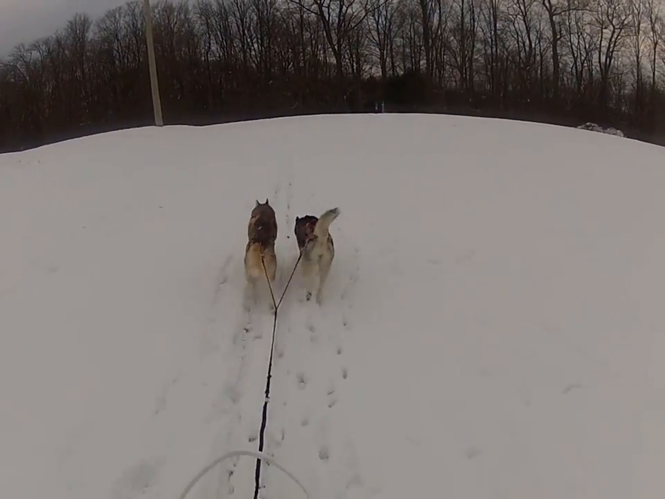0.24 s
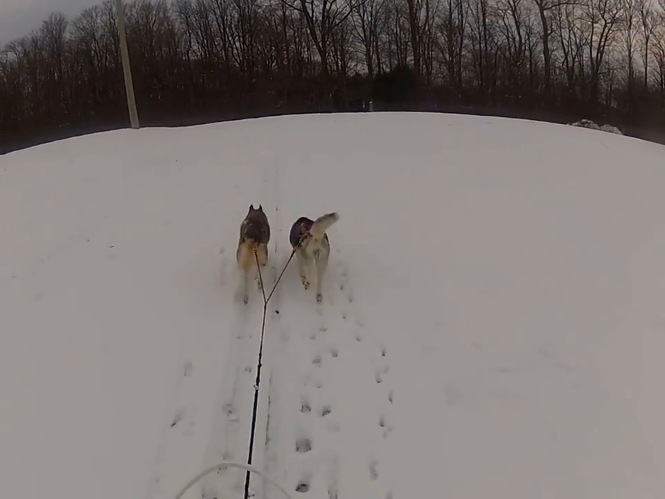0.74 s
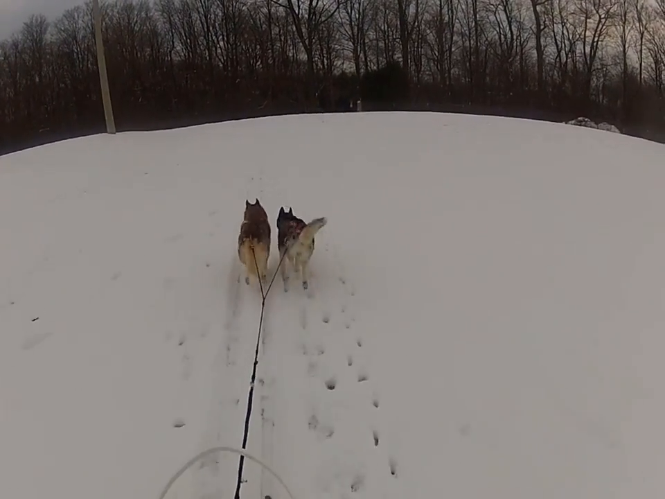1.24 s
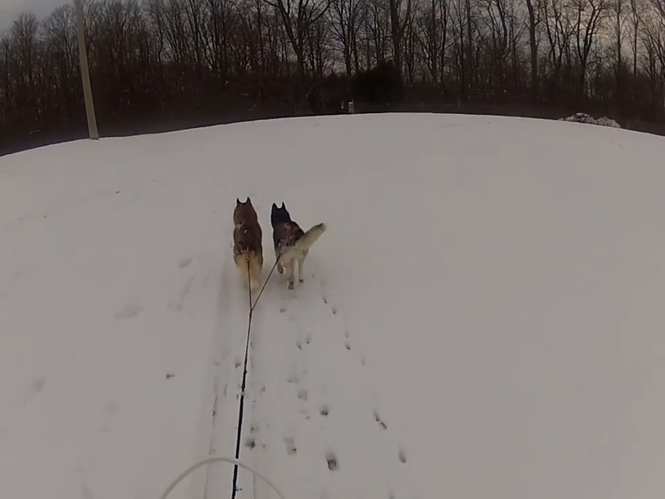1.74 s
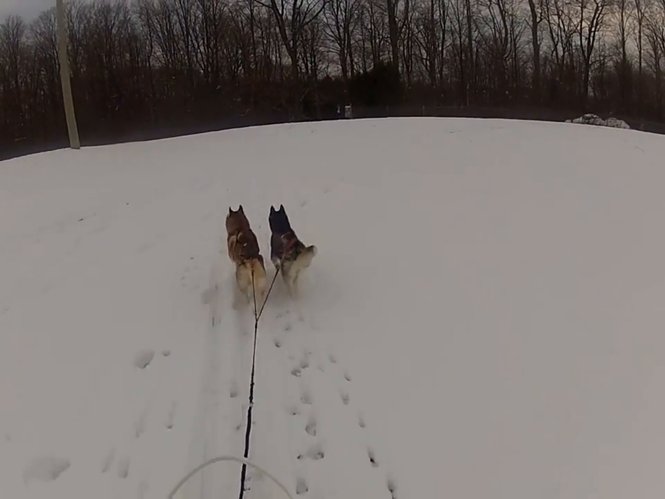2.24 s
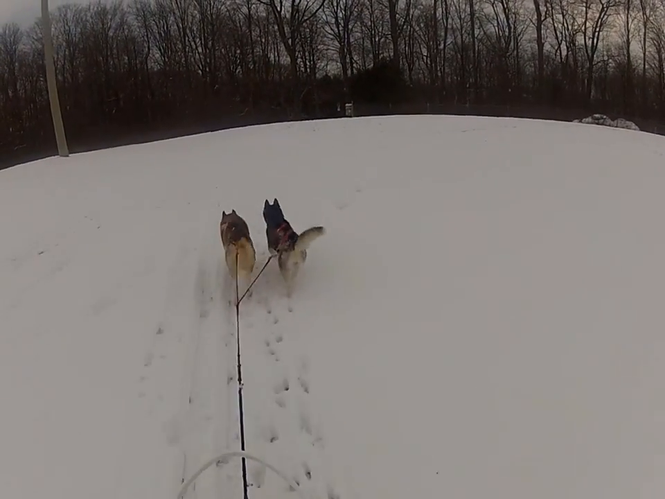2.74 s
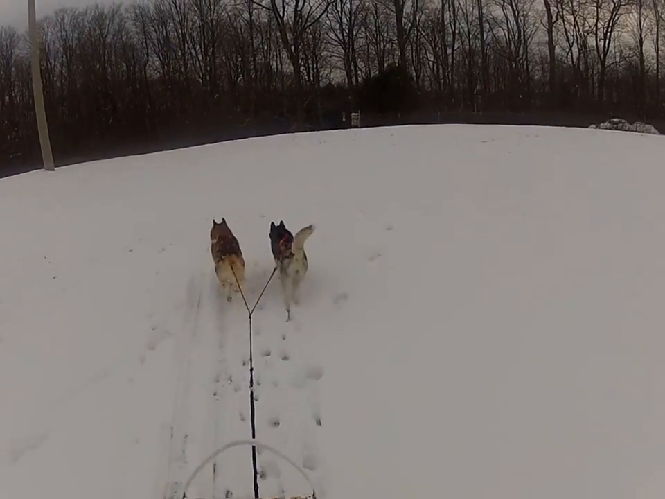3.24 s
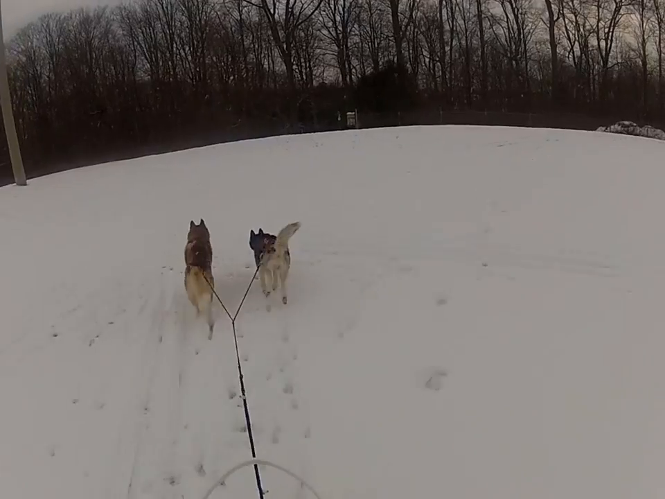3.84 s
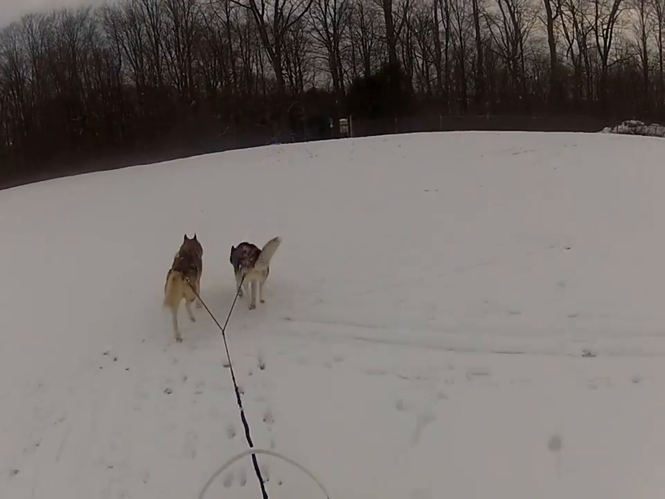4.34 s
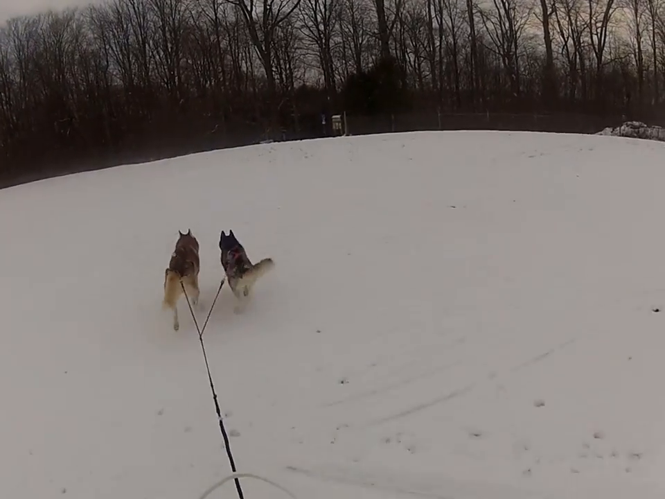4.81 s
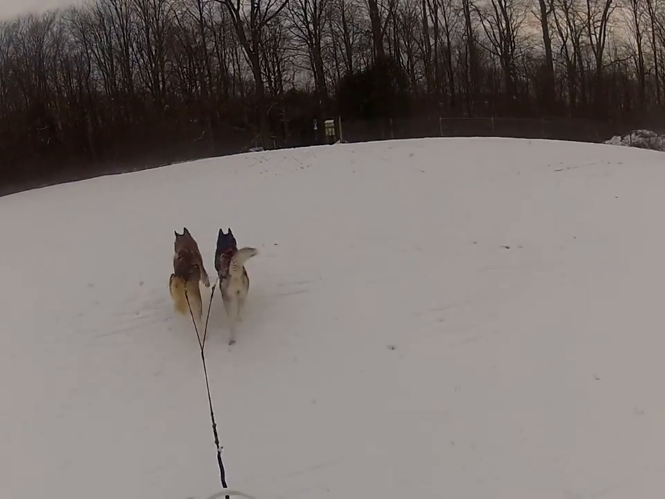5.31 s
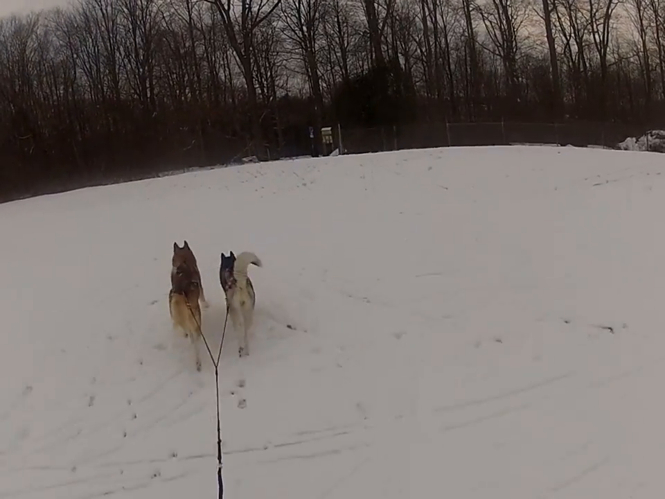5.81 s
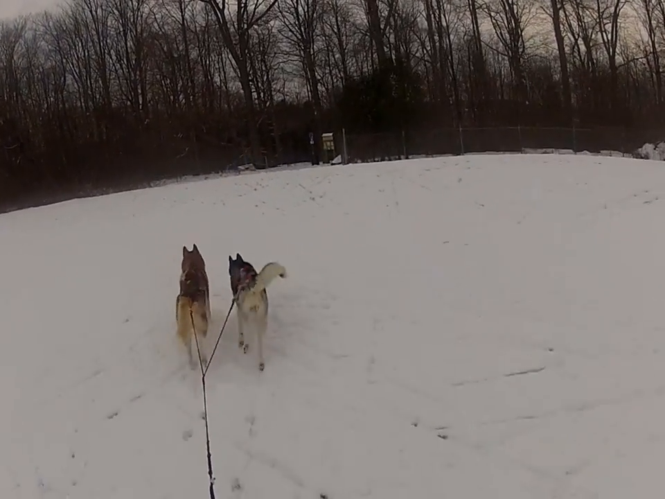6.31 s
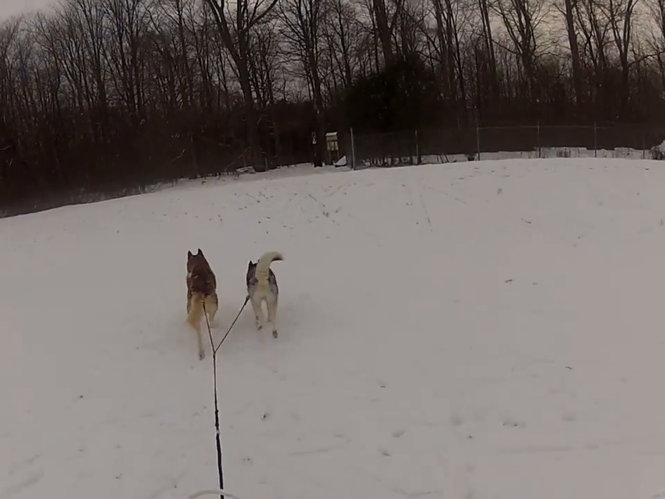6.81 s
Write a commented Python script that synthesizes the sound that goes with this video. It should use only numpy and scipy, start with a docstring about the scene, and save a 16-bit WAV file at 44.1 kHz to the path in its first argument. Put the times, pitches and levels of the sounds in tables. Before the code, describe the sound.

A muffled snow hiss runs under irregular bumps, with a camera clattering and thudding against its plastic case as a sled jolts along.

```python
"""On a dog sled over snow, inside the closed plastic case of a small camera: the runners hiss through the case
and the frame shudders, both filtered noise. At bumps the mount thumps and the camera knocks and rattles
against the case, as struck decaying modes. Faint high noise, about 4.4 to 6.6 kHz, rises in short patches,
with a few faint short bursts of high noise.
Sampling at 12 kHz and holding in steps puts mirror images of the sound in the treble."""
import sys
import numpy as np
from scipy import signal
from scipy.fft import rfft, irfft, next_fast_len
from scipy.io import wavfile

SR = 44100
rng = np.random.default_rng(int(sys.argv[2]) if len(sys.argv) > 2 else 0)


def persist_wave(psi):
    """Save psi, clipped to +-1, as 16-bit WAV."""
    counts = np.round(np.clip(psi, -1, 1) * 32767).astype(np.int16)
    wavfile.write(sys.argv[1], SR, np.atleast_2d(counts).T)


N = 311346


def amp(db):
    """Gain of a level in dB."""
    return 10 ** (np.asarray(db) / 20)


def unit(x):
    """Scaled to rms 1."""
    return x / np.sqrt(np.mean(x ** 2) + 1e-20)


def drift(rate_hz):
    """Slow random wander of rms 1: noise through two equal poles, run at one value per 40 samples."""
    step, settle = 40, 2000
    pole = np.exp(-2 * np.pi * rate_hz * step / SR)
    white = rng.standard_normal(N // step + settle + 2)
    slow = signal.lfilter([1], [1, -2 * pole, pole * pole], white)[settle:]
    return np.interp(np.arange(N) / step, np.arange(len(slow)), unit(slow))


def grainy_noise(spread_db):
    """White noise with a random boost per sample, capped at five times the spread."""
    return rng.standard_normal(N) * amp(spread_db * np.minimum(rng.exponential(1, N), 5))


def coloured(white, spectrum, peaks=()):
    """Noise shaped by a spectrum and lifted at resonances; rms 1."""
    size = next_fast_len(N)
    hz = np.maximum(np.arange(size // 2 + 1) * SR / size, 1)
    point_hz, point_db = np.transpose(spectrum)
    level_db = np.interp(np.log(hz), np.log(point_hz), point_db, left=-99, right=-99)
    for centre_hz, width_hz, lift_db in peaks:
        level_db = level_db + lift_db / (1 + (2 * (hz - centre_hz) / width_hz) ** 2)
    return unit(irfft(rfft(white, size) * amp(level_db), size)[:N])


def band(x, low_hz, high_hz):
    """Band-pass."""
    return signal.sosfilt(signal.butter(2, [low_hz, high_hz], "band", fs=SR, output="sos"), x)


def add(track, start_s, sound, peak_db):
    """Lays a short sound on the track at a given peak level."""
    i = round(start_s * SR)
    sound = sound[:N - i]
    track[i:i + len(sound)] += amp(peak_db) * sound / np.abs(sound).max()


def ringing(modes, luck_db, size=3600):
    """Impulse response of a set of modes: decaying sines, each level shifted by luck."""
    t = np.arange(size) / SR
    total = np.zeros(size)
    for (hz, level_db, t60_s), shift_db in zip(modes, luck_db):
        total += amp(level_db + shift_db - 60 * t / t60_s) * np.sin(2 * np.pi * hz * t)
    return total


# sled lurches over bumps: start_s, shudder_top_db, hold_s
LURCHES = [(0.077, -50, 0.035), (0.33, -38.5, 0.35), (0.97, -42.5, 0.018), (1.13, -37.5, 0.021),
           (1.398, -27.5, 0.023), (1.538, -26.5, 0.015), (1.876, -41, 0.041), (2.03, -44.5, 0.036),
           (2.208, -38.5, 0.031), (2.462, -30.5, 0.12), (2.623, -24.5, 0.014), (3.067, -42, 0.027),
           (3.38, -35, 0.22), (3.728, -38.5, 0.017), (4.306, -33.5, 0.0092), (4.397, -30.5, 0.0077),
           (4.517, -34.5, 0.14), (4.988, -43.5, 0.02), (5.412, -34.5, .08), (5.498, -29, 0.055),
           (5.93, -35, 0.024), (6.164, -31.5, 0.017), (6.398, -32, 0.019), (6.514, -27, 0.0056),
           (6.643, -40, 0.25), (6.81, -32.5, .02)]
CALM_DB, RISE_DB_PER_S, FALL_DB_PER_S = -47.5, 220, 185


def lurching():
    """Shudder above calm, in dB: each lurch rises, holds and falls; the strongest wins."""
    t, swing_db = np.arange(N) / SR, np.zeros(N)
    for start_s, top_db, hold_s in LURCHES:
        before_s = np.maximum(start_s - t, 0)
        after_s = np.maximum(t - start_s - hold_s, 0)
        loss_db = RISE_DB_PER_S * before_s + FALL_DB_PER_S * after_s
        swing_db = np.maximum(swing_db, top_db - CALM_DB - loss_db)
    return swing_db


# runner hiss inside the case: pitch_hz, relative_level_db_per_hz
HISS_SPECTRUM = [(180, -38), (300, -13), (503, -14), (666, -13), (965, -8.5), (1130, -8.5), (1260, -3.5),
                 (1380, -9.5), (1940, -4.5), (2220, -13), (2430, -11), (2680, -22.5), (3680, -23.5),
                 (4400, -32.5), (5720, -85), (9680, -120)]
# case walls ringing with the hiss: pitch_hz, width_hz, lift_db
HISS_PEAKS = [(995, 160, 2.5), (1246, 37, 3), (1865, 160, -3), (3520, 61, 6.5)]
# hiss course: time_s, level_db
GLIDE_HISS = [(0.0, -54.5), (0.37, -51), (0.94, -55), (1.38, -53), (1.65, -56), (2.36, -52), (2.5, -50),
              (2.68, -52), (2.87, -60.5), (3.22, -60), (3.44, -54), (4.19, -60), (4.34, -53), (4.6, -51.5),
              (5.13, -60), (5.42, -57.5), (6.02, -59.5), (6.53, -56), (7.06, -60.5)]
HISS_FOLLOWS = 0.064   # runners bite harder in a lurch: dB per dB of swing


def runners(swing_db):
    """Snow crystals break under the runners: dense grains, wavering in level."""
    hiss_db = np.interp(np.arange(N) / SR, *np.transpose(GLIDE_HISS)) + HISS_FOLLOWS * swing_db
    waver_db = 1.0 * drift(8.8) + 0.59 * drift(40)
    return amp(hiss_db + waver_db) * coloured(grainy_noise(2.5), HISS_SPECTRUM, HISS_PEAKS)


# frame shudder: pitch_hz, relative_level_db_per_hz
SHUDDER_SPECTRUM = [(15, 5), (30, -3), (45, -3.5), (70, -13.5), (100, -18.5), (140, -22.5)]
# mount hum: pitch_hz, relative_level_db_per_hz
HUM_SPECTRUM = [(70, -16), (110, -8.5), (170, -2.5), (220, -3.5), (300, -12), (450, -17.5), (600, -22)]
HUM_CALM_DB, HUM_FOLLOWS = -57.5, 0.36   # follows: dB per dB of swing


def frame(swing_db):
    """The frame shakes slowly; the mount hums in a higher band, in lumps."""
    shudder_gain = amp(CALM_DB + swing_db + 0.42 * drift(9.5))
    shudder = shudder_gain * coloured(rng.standard_normal(N), SHUDDER_SPECTRUM)
    hum_gain = amp(HUM_CALM_DB + HUM_FOLLOWS * swing_db + 3.04 * drift(23))
    hum = hum_gain * coloured(rng.standard_normal(N), HUM_SPECTRUM)
    return shudder + hum


# faint high noise: pitch_hz, relative_level_db_per_hz
HIGH_NOISE_SPECTRUM = [(3800, -32), (4350, -4.5), (4700, 6), (5300, 4), (6000, -4), (6600, 0)]
# patches where it rises: start_s, length_s, level_db
NOISE_PATCHES = [(0.307, 0.095, -77), (1.33, 0.09, -73), (1.497, .08, -73), (3.227, 0.15, -75),
                 (3.966, 0.053, -75), (4.83, 0.2, -78), (5.313, .22, -73.5), (5.592, .05, -76),
                 (5.83, .09, -74), (6.068, 0.14, -74.5), (6.25, 0.045, -74), (6.326, 0.32, -81)]
HIGH_NOISE_DB, PATCH_RAMP_S = -77.5, 0.0068


def high_noise():
    """Grainy noise, about 4.4 to 6.6 kHz, faint throughout, that rises in short patches."""
    t, patches = np.arange(N) / SR, np.zeros(N)
    for start_s, length_s, level_db in NOISE_PATCHES:
        to_edge_s = np.minimum(t - start_s, start_s + length_s - t)
        patches += amp(level_db) * np.clip(to_edge_s / PATCH_RAMP_S, 0, 1)
    gain = amp(HIGH_NOISE_DB + 1.6 * drift(26)) + patches * amp(1.1 * drift(90))
    return gain * coloured(grainy_noise(3.3), HIGH_NOISE_SPECTRUM)


# faint short bursts of high noise: start_s, peak_db
NOISE_BURSTS = [(0.3738, -57), (0.4941, -52), (0.8032, -55), (1.099, -52.5), (3.01, -55), (3.9769, -52),
                (4.1185, -53.5), (4.7297, -51), (6.2767, -57), (6.3435, -47.5)]


def noise_bursts():
    """Faint bursts of band-passed noise, a few milliseconds each."""
    out, size = np.zeros(N), 240
    for start_s, peak_db in NOISE_BURSTS:
        burst = rng.standard_normal(size) * np.hanning(size)
        add(out, start_s, band(burst, 4400, 5800), peak_db)
    return out


# mount modes: pitch_hz, level_db, t60_s
MOUNT_MODES = [(169.9, 7.5, 0.042), (248, -5.5, 0.032), (119, -39.5, 0.0083)]
# jolts to the mount: crest_s, peak_db, direction (+1 or -1)
THUMPS = [(0.524, -29, -1), (0.5655, -34, 1), (1.031, -36, 1), (1.3818, -22, 1), (1.3985, -10, 1),
          (1.5244, -22.5, -1), (1.6494, -32, 1), (2.4722, -7.5, 1), (2.5336, -23, 1), (2.554, -22.5, 1),
          (2.5943, -28, 1), (2.6695, -7.5, 1), (3.2287, -31.5, -1), (3.2632, -15, 1), (3.33, -22, -1),
          (3.363, -26, 1), (3.4293, -11.5, 1), (3.5145, -19.5, 1), (3.5726, -21, 1), (3.5897, -14, -1),
          (3.8893, -33.5, 1), (4.262, -16.5, 1), (4.327, -36, 1), (4.4181, -13, 1), (4.521, -26.5, -1),
          (4.539, -15, -1), (4.595, -19, 1), (4.617, -32, 1), (4.6364, -25, 1), (4.716, -29, -1),
          (5.1493, -33.5, -1), (5.4679, -24.5, -1), (5.5137, -9.5, 1), (5.556, -25, -1), (5.6174, -31, 1),
          (5.7164, -31.5, 1), (5.926, -16.5, -1), (6.1613, -16.5, -1), (6.2, -28, -1), (6.4165, -25, -1),
          (6.4317, -9, 1), (6.4787, -18.5, -1), (6.49, -17.5, 1), (6.531, -24.5, -1), (6.5662, -11, 1),
          (6.613, -20.5, 1), (6.6323, -20, 1), (6.706, -25.5, 1), (6.756, -22.5, 1), (6.781, -20, 1)]
PUSH_S, MOUNT_LUCK_DB = 0.0016, 4.6


def thumps():
    """A soft short push sets the mount swinging in its modes."""
    out = np.zeros(N)
    push = np.hanning(round(PUSH_S * SR))
    for crest_s, peak_db, direction in THUMPS:
        luck_db = rng.normal(0, MOUNT_LUCK_DB, len(MOUNT_MODES))
        swing = np.convolve(push, ringing(MOUNT_MODES, luck_db))
        start_s = crest_s - np.argmax(swing) / SR
        add(out, start_s, np.sign(direction) * swing, peak_db)
    return out


# case wall modes: pitch_hz, level_db, t60_s
CASE_MODES = [(678, -9, 0.0028), (806, -5.5, 0.021), (969, 5, 0.011), (1152, -2.5, 0.025),
              (1231, -4, 0.021), (1692, -19.5, 0.045), (1907, 10.5, 0.009), (2150, -13, 0.014),
              (2257, -20, 0.04), (3370, 1, 0.011), (3630, 14.5, 0.019), (3840, 1, 0.011), (3330, -1, 0.033),
              (3785, -5, 0.0072)]
# camera against case: start_s, low_peak_db, middle_over_low_db, high_over_middle_db, contact_ms, favoured_low_hz
KNOCKS = [(1.2043, -49, 10.5, -20, 1.2, 1280), (1.394, -10, 1.5, -15, 3.9, 940),
          (1.431, -30, 13.5, -8.5, 0.27, 1440), (1.4845, -37, -11, -13, 1.2, 810),
          (1.51, -26.5, -7.5, -10, 3, 1250), (1.5237, -20, -1, -16.5, 0.58, 754),
          (1.5903, -35, -12, -23, 0.28, 1230), (1.6446, -42, 6, -31, 0.96, 730),
          (2.2693, -35, 7, 1, 4.5, 970), (2.471, -7.5, -6.5, -14, 4, 970),
          (2.49, -22.5, 7.5, -12.5, 0.58, 754), (2.5216, -25, -5, -23, 0.8, 1080),
          (2.5252, -19.5, -2.5, -9, 4.6, 1250), (2.566, -34, -15, -11, 1.2, 820),
          (2.5914, -20.5, 8, -12, 0.5, 766), (2.6023, -33.5, -9, -5, 1.6, 810),
          (2.6639, -40.5, 4.5, -3, 1.7, 1250), (2.6682, -6.5, -3.5, -33, 1.36, 1210),
          (3.2269, -39, -7, -7, 2.5, 1210), (3.2569, -20.5, -8.5, -9.5, 0.87, 1110),
          (3.2622, -20, -12.5, -23, 2.3, 850), (3.3277, -21.5, 4, -45, 1.4, 1220),
          (3.3621, -19, -3, -35, 0.57, 1220), (3.4292, -11.5, -2, -24, 2.3, 990),
          (3.501, -25.5, -5, -19, 1.1, 1206), (3.5122, -19, 1, -32, 1.7, 825),
          (3.5472, -32.5, 17.5, -14, 0.56, 1210), (3.5537, -26, -10, -9, 2.5, 1190),
          (3.5724, -15.5, -8, -2, 1.9, 1260), (3.5878, -19.5, 8.5, -29, 0.77, 1440),
          (3.594, -18.5, 14, -20.5, 0.54, 1440), (3.7009, -43.5, 0.1, -8, 2.8, 1170),
          (4.2528, -34.5, 14, -2, 1.4, 1250), (4.2576, -8, -3.5, -26, 0.9, 1200),
          (4.2808, -22, -3.5, -9, 2, 1220), (4.3198, -21, -4.5, -7.5, 1.1, 1240),
          (4.4147, -14, -9, -18, 2.8, 960), (4.5168, -25.5, -8, -9, 1.3, 1170),
          (4.5324, -19.5, 3.5, -21.5, 3.6, 684), (4.588, -21.5, -2.5, -11.5, 6.7, 960),
          (4.6021, -25, 1, -35, 1.2, 1260), (4.62, -18, 0.5, -28, 1.8, 1170),
          (4.6337, -38, 5, -18, 1.6, 780), (4.7115, -36, -4, -22.5, 3.8, 1230),
          (5.1255, -36.5, 8, -0.5, 3.1, 1000), (5.386, -46.5, 6, -12, 1.9, 1250),
          (5.426, -38, 2.5, -12, 3.2, 1590), (5.4321, -26.5, 6.5, -5, 1.64, 1300),
          (5.4627, -37.5, 1.5, -22, 2.7, 734), (5.4906, -30, -5, -25, 1.9, 1230),
          (5.5053, -16.5, -10, -15.5, 2, 1060), (5.5127, -10.5, 4, -26.5, 0.9, 850),
          (5.5435, -49, 9, -11, 2.8, 1250), (5.554, -30.5, 3, -34, .7, 1250),
          (5.6122, -33.5, -5, -27, 2.1, 1180), (5.6553, -46.5, 6.5, -15, .63, 1360),
          (5.7107, -5.5, 5.5, -9, 1.03, 940), (5.917, -40, 10, -15.5, 3.6, 950),
          (5.9233, -23, -5, -22, 2.8, 1180), (5.9627, -45, 7.5, -15, 5.5, 1290),
          (6.1507, -21, 5.5, -6.5, 2.36, 736), (6.1901, -38, 6, -21.5, 6, 1370),
          (6.397, -39, 0.5, -23, 1.1, 1140), (6.415, -32, -23, -17.5, 1.7, 960),
          (6.4266, -33, 2, -9, 0.91, 660), (6.4301, -12.5, -4.5, -35, 0.47, 960),
          (6.4387, -37, -6, -15, 2.7, 800), (6.4736, -18, -3, -7.5, 2.8, 1250),
          (6.487, -28, -12, -4, 2.7, 760), (6.5488, -36, -13, -7, 1.3, 830),
          (6.564, -10.5, 2, -23.5, 0.78, 930), (6.5841, -46, 13, -11.5, 2.9, 1040),
          (6.6075, -15.5, -6, -6.5, 0.6, 1230), (6.6277, -20.5, 4, -33, 1.23, 1240),
          (6.7014, -18.5, -9.5, -14, 2.7, 1060), (6.755, -28, -7, -11, 0.99, 960),
          (6.7581, -14, -6.5, -4.5, 2.8, 1200), (6.769, -23, 3, -24, 1.3, 1240),
          (6.7778, -27.5, -6, -7, 1.6, 758)]
CASE_LUCK_DB, FAVOUR_DB, FAVOUR_WIDTH_HZ = 4.5, 8, 110
SETTLING_DB, SETTLING_T60_S = -38.0, 0.021
# click above the modes: offset, share of high modes' level, loss per ms of contact
CLICK_OFFSET_DB, CLICK_FOLLOWS, CLICK_LOSS_DB_PER_MS = -15.5, 0.99, 1


def knocks(rows):
    """Each knock is a quick chatter of contacts and a scatter of loose ones; it strikes all wall modes afresh."""
    out, size, modes = np.zeros(N), 1400, np.array(CASE_MODES)
    t, mode_hz = np.arange(size) / SR, modes[:, 0]
    low, high = mode_hz < 1450, mode_hz > 2750
    middle = ~low & ~high
    for start_s, low_db, middle_over_low_db, high_over_middle_db, contact_ms, favoured_hz in rows:
        middle_db = low_db + middle_over_low_db
        high_db = middle_db + high_over_middle_db
        noise = rng.standard_normal(size)
        phase = t / (max(contact_ms, 0.3) * 1e-3)
        chatter = phase * np.exp(-2.4 * phase)
        settling = amp(SETTLING_DB - 60 * t / SETTLING_T60_S) * np.abs(noise)
        force = noise * np.abs(noise) * (chatter + settling)
        # the spot struck favours wall modes near one pitch
        luck_db = rng.normal(0, CASE_LUCK_DB, len(modes))
        luck_db += FAVOUR_DB * np.exp(-((mode_hz - favoured_hz) / FAVOUR_WIDTH_HZ) ** 2)
        for group, low_hz, high_hz, peak_db in [(low, 620, 1700, low_db),
                                                (middle, 1200, 2900, middle_db),
                                                (high, 2600, 4200, high_db)]:
            rung = np.convolve(force, ringing(modes[group], luck_db[group], size=1600))
            add(out, start_s, band(rung, low_hz, high_hz), peak_db)
        click_db = CLICK_OFFSET_DB + CLICK_FOLLOWS * high_db - CLICK_LOSS_DB_PER_MS * contact_ms
        add(out, start_s, band(force, 5020, 5720), click_db)
    return out


CALM_RATTLES_PER_S, RATTLE_MIN_DB, RATTLE_SPREAD_DB = 0.25, -50.5, 9
RATTLE_FOLLOWS = 1.3   # dB of rate per dB of swing


def rattles(swing_db):
    """Faint loose knocks at random, likelier in each lurch."""
    slot = 441   # samples: one chance every 10 ms
    dice = rng.random((N // slot, 6))
    start_s = (np.arange(len(dice)) + dice[:, 0]) * slot / SR
    rate_per_s = CALM_RATTLES_PER_S * amp(RATTLE_FOLLOWS * swing_db[::slot][:len(dice)])
    hit = dice[:, 1] < rate_per_s * slot / SR
    low_db = RATTLE_MIN_DB + RATTLE_SPREAD_DB * dice[:, 2]
    middle_over_low_db = 12 * dice[:, 3] - 8
    high_over_middle_db = np.full(len(dice), -14.0)
    contact_ms = 0.8 + 1.5 * dice[:, 4]
    favoured_hz = 750 + 520 * dice[:, 5]
    rows = [start_s, low_db, middle_over_low_db, high_over_middle_db, contact_ms, favoured_hz]
    return knocks(np.transpose(rows)[hit])


def scene():
    """One microphone inside the case feeds both channels."""
    swing_db = lurching()
    steady = runners(swing_db) + frame(swing_db) + high_noise()
    blows = thumps() + knocks(KNOCKS) + rattles(swing_db)
    case = steady + noise_bursts() + blows
    return np.array([case, case])


SAMPLE_HZ, STEP_HZ = 12000, 48000
TREBLE_EDGE_HZ, CUTOFF_HZ = 15150, 16489
CLIP_LEVEL = 0.78


def record(dry):
    """Sampling mirrors the sound about the sample rate; holding each value four steps weakens the mirror."""
    kept = signal.sosfilt(signal.cheby2(12, 50, 6700, fs=SR, output="sos"), dry)
    sampled = kept * (1 + 2 * np.cos(2 * np.pi * SAMPLE_HZ * np.arange(N) / SR))
    size = next_fast_len(N)
    hz = np.arange(size // 2 + 1) * SR / size
    hold = np.sinc(hz / SAMPLE_HZ) / np.sinc(hz / STEP_HZ)
    held = irfft(rfft(sampled, size) * hold, size)[:, :N]
    overloaded = np.clip(held, -CLIP_LEVEL, CLIP_LEVEL)
    dulled = signal.sosfilt(signal.ellip(6, 1, 24, TREBLE_EDGE_HZ, fs=SR, output="sos"), overloaded)
    return signal.sosfilt(signal.cheby2(16, 90, CUTOFF_HZ, fs=SR, output="sos"), dulled)


dry = scene()
out = record(dry)
persist_wave(out)
```